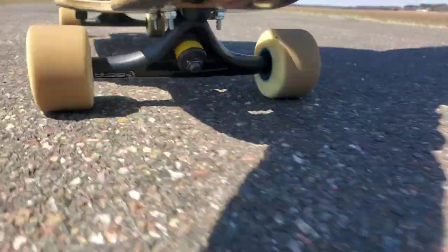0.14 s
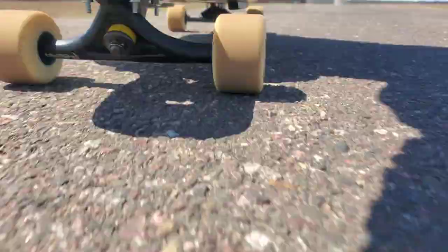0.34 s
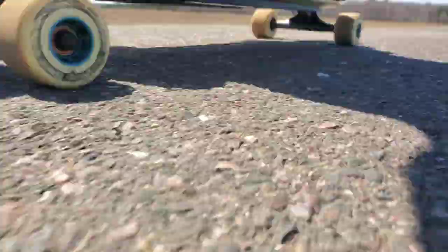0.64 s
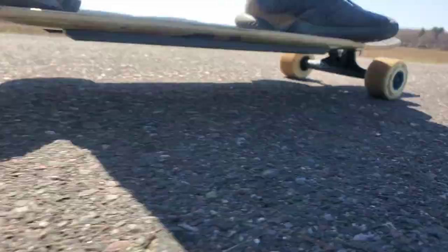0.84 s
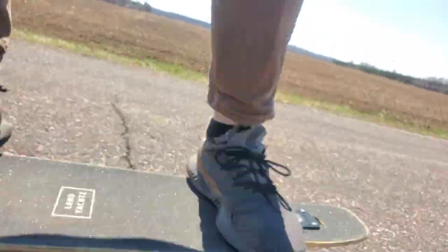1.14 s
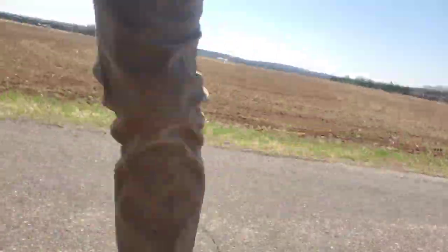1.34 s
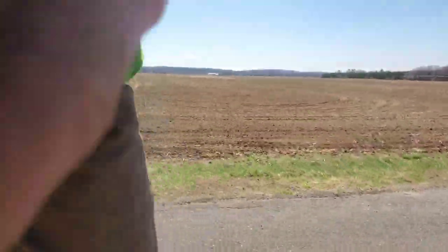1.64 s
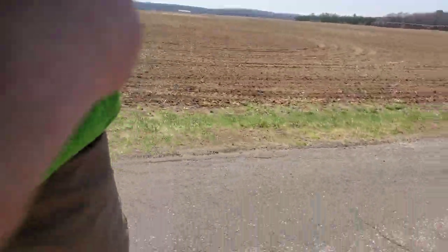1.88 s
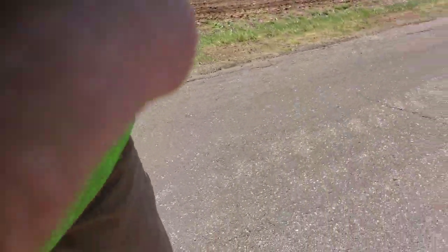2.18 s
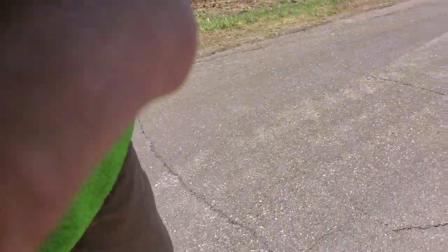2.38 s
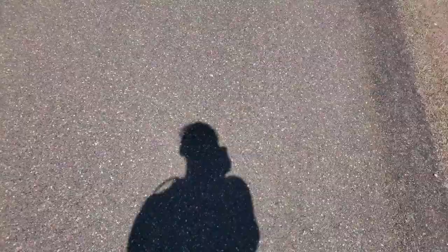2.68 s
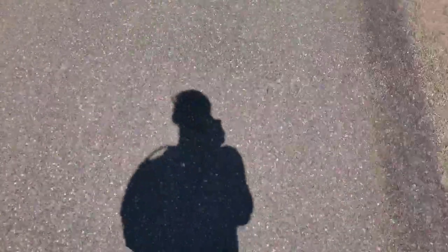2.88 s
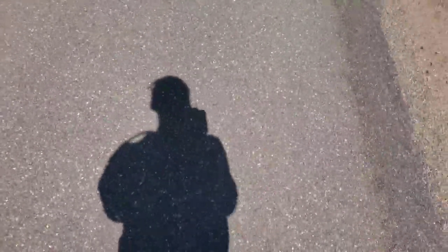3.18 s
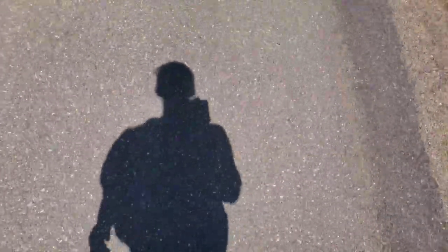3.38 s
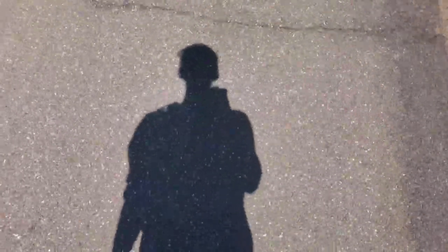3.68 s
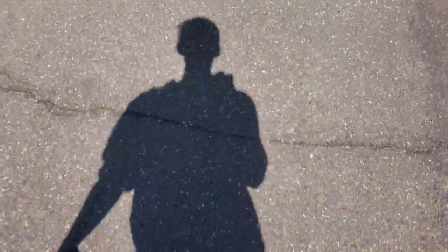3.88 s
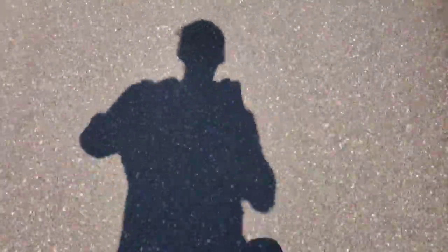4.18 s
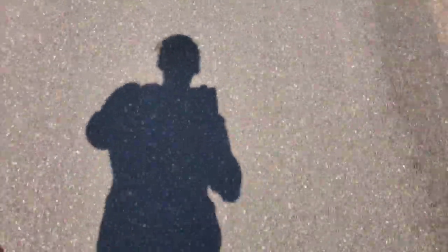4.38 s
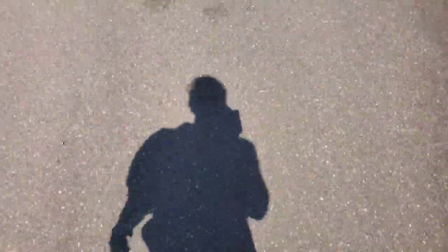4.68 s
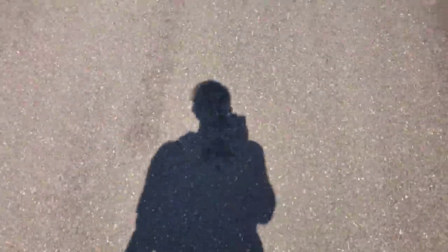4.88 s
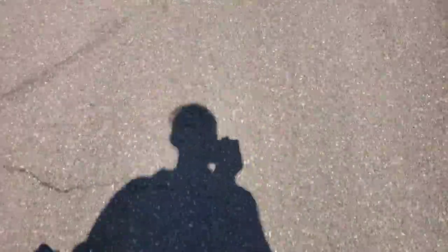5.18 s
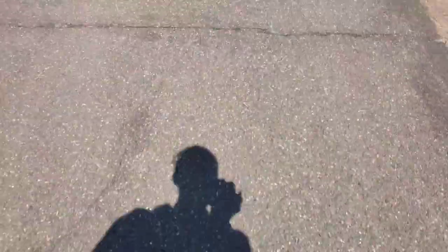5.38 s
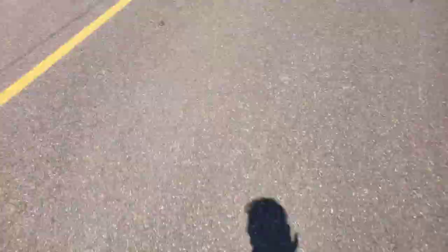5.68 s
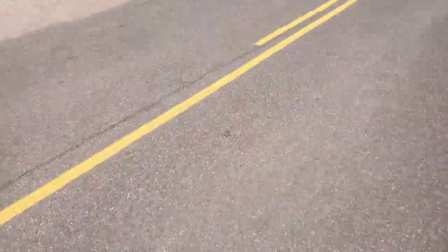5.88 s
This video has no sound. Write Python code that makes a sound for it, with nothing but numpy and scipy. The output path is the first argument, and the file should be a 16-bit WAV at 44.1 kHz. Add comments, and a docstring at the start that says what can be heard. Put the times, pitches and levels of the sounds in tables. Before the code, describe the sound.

Skateboard wheels rumble and hiss on a rough road up close, then after a cut roll louder and faster, chattering through turns.

```python
"""A low, ringing roar: a longboard rolls over coarse asphalt, heard from down by the wheels and then,
after a short silence, faster and from chest height. Stones in the road drum on the wheels and ring
the deck (the wooden board), higher when the wheels are pressed hard. In the carves (leaning turns)
the wheels scrub and chatter. Grit hisses and ticks under them, big stones knock, the bending deck
hums briefly, and a headwind buffets the left and right openings of the microphone."""
import sys
import numpy as np
from scipy import signal
from scipy.fft import rfft, irfft, next_fast_len
from scipy.io import wavfile
from scipy.ndimage import uniform_filter1d, map_coordinates

SR = 44100
rng = np.random.default_rng(int(sys.argv[2]) if len(sys.argv) > 2 else 0)


def generate_wav(signal):
    """Clip the signal to [-1, 1] and save it as 16-bit WAV at the path in sys.argv[1]."""
    frames = np.transpose(np.atleast_2d(signal))
    scaled = np.clip(frames, -1, 1) * 32767
    pcm = np.round(scaled).astype(np.int16)
    wavfile.write(sys.argv[1], SR, pcm)


N = 265910
TIME = np.arange(N) / SR
NEAR_END_S, FAR_START_S = 2.7222, 2.7927  # "near" is by the wheels, "far" is at chest height


def near_then_far(near, far):
    """One value for the first scene, another for the second."""
    return np.where(TIME < FAR_START_S, near, far)


def gain_of(db):
    """Turns decibels into a number to multiply by."""
    return 10 ** (np.asarray(db) / 20)


def evened(x):
    """Scales a sound to an average strength (rms) of 1."""
    return x / np.sqrt(np.mean(x ** 2) + 1e-20)


def peaked(x):
    """Scales a sound to a peak of 1."""
    return x / abs(x).max()


def steadied(x, span_s=1.0):
    """Holds the middle of a stereo sound near strength 1, keeping its fast flutter."""
    window = np.hanning(int(span_s * SR))
    power = signal.fftconvolve(x.mean(0) ** 2, window, "same")
    power /= signal.fftconvolve(np.ones(N), window, "same")
    return x / np.sqrt(abs(power) + 1e-20)


def follow(table):
    """Joins a table's points in time with straight lines, one curve a column."""
    times, *columns = np.transpose(table)
    return [np.interp(TIME, times, column) for column in columns]


def swells(table):
    """The strength of events that each build up and die away."""
    peak_s, db, build, release = np.transpose(table)
    since = TIME[:, None] - peak_s
    bells = np.exp(-(since / np.where(since < 0, build, release)) ** 2)
    return np.linalg.norm(gain_of(db) * bells, axis=1)


def level_at(tone, hz):
    """Looks up a tone table's level at any frequency."""
    table_hz, db = np.transpose(tone)
    return np.interp(np.log(hz + 1), np.log(table_hz + 1), db)


def colour(x, tone, size=8192):
    """Filters a sound by a tone table; clicks keep their sharp starts."""
    log_gain = np.log(gain_of(level_at(tone, abs(np.fft.fftfreq(size, 1 / SR)))))
    taps = np.fft.ifft(np.exp(np.conj(signal.hilbert(log_gain)))).real[:size // 2]
    return signal.oaconvolve(x, taps[None], axes=1)[:, :N]


def resonate(x, hz, width_hz):
    """Makes a sound ring at a pitch that may slide."""
    turn = np.exp(2j * np.pi * np.cumsum(hz) / SR)
    fade = np.exp(-np.pi * width_hz / SR)
    return 2 * (turn * signal.lfilter([(1 - fade) ** 2], [1, -2 * fade, fade * fade], x / turn)).real


def add(mix, start_s, sound):
    """Mixes a sound in at the given time."""
    part = mix[..., max(round(start_s * SR), 0):][..., :sound.shape[-1]]
    part += sound[..., :part.shape[-1]]


def flutter(rate_hz, channels=1):
    """A smooth random wobble of strength 1, up to about this rate."""
    size = next_fast_len(N)
    hz = np.fft.rfftfreq(size, 1 / SR)
    spectrum = rfft(rng.standard_normal((channels, size))) / (1 + (hz / rate_hz) ** 4)
    return evened(irfft(spectrum, size)[:, :N])


def spread(pair, width):
    """Makes stereo: the first signal goes to both sides alike, the second with opposite signs."""
    return pair[0] + np.array([[1], [-1]]) * width * pair[1]


def stones(per_s, spread_db):
    """Two random streams of tiny hits: many small, a few large."""
    size = gain_of(spread_db * np.minimum(rng.exponential(1, (2, N)), 5))
    return size * rng.choice([-1, 1], (2, N)) * (rng.random((2, N)) < per_s / SR)


# The road's push on the board, a near table and a far one: (time [s], level [dB])
ROAD_PUSH = [
    [(0, -32.5), (0.1, -29), (0.19, -28), (0.33, -35), (0.47, -34), (0.62, -31), (0.72, -30.5), (0.9, -32),
     (1.15, -38.5), (1.28, -32.5), (1.39, -30), (1.5, -26.5), (1.62, -30.5), (1.8, -34), (1.95, -34),
     (2.05, -26), (2.13, -40.5), (2.23, -32), (2.42, -36.5), (2.55, -32), (2.72, -31.5)],
    [(2.79, -27), (2.91, -25), (2.945, -27.5), (3.0, -27.5), (3.3, -28.5), (3.62, -28), (3.7, -31.5),
     (3.78, -28.5), (3.84, -34.5), (3.89, -22.5), (3.938, -35.5), (3.96, -24.5), (4.05, -23), (4.11, -25),
     (4.2, -21), (4.29, -21.5), (4.32, -22.5), (4.38, -19.5), (4.41, -22.5), (4.47, -17.5), (4.57, -27),
     (4.68, -21.5), (4.735, -28.5), (4.81, -26), (4.93, -32), (5.06, -25), (5.14, -28), (5.23, -24),
     (5.35, -22), (5.45, -24.5), (5.6, -26.5), (5.8, -25.5), (5.89, -25.5), (6.03, -23.5)],
]


def rolling():
    """How hard the road shakes the board at each moment."""
    return gain_of(near_then_far(*(follow(table)[0] for table in ROAD_PUSH)))


# The natural notes of the deck and its axles: (pitch [Hz], width [Hz], level [dB])
DECK_NOTES = [(421.3, 45, 1), (459.7, 41.3, -1), (518, 52, -9), (575.9, 35.6, -0.5), (610.8, 40, -1),
              (735, 50, 3), (796, 41, -4.5)]
# The notes slide as the rider's weight shifts: (time [s], change [share of pitch])
NOTE_SLIDE = [(0, 0.023), (0.8, 0.013), (1.4, 0.019), (1.9, 0.015), (2.35, 0.0014), (2.9, 0.0052),
              (3.5, 0.0085), (4.05, -0.015), (4.35, 0.018), (4.8, 0.0024), (5.25, -0.005), (5.8, -0.017)]
# The pitch the wheels excite most, higher when pressed hard: (time [s], pitch [Hz])
CONTACT_PITCH = [(0, 485), (0.8, 522), (1.35, 490), (1.62, 555), (1.95, 590), (2.3, 460), (2.72, 540),
                 (2.92, 484), (3.2, 532), (3.45, 610), (3.8, 604), (4.13, 660), (4.28, 533), (4.46, 642),
                 (4.62, 553), (4.9, 590), (5.2, 700), (5.45, 580), (5.75, 597), (5.95, 500)]
# Slow wheels strike softly and leave the high notes quiet: (frequency [Hz], level [dB])
SLOW_WHEEL_TONE = [(620, 0.5), (710, -15.5), (1000, -9.5)]


def deck_roar(road):
    """Stones ring the deck's drifting notes; close to the wheels the sound is wider."""
    blows = spread(road, width=near_then_far(0.26, 0.12))
    drifts = 1 + follow(NOTE_SLIDE)[0] + 0.016 * flutter(rate_hz=6.7, channels=len(DECK_NOTES))
    notes = [steadied(resonate(blows, hz * drift, width))
             for (hz, width, _), drift in zip(DECK_NOTES, drifts)]
    flicker = gain_of(2.0 * flutter(rate_hz=6.9, channels=len(DECK_NOTES)))
    drives = note_shares(follow(CONTACT_PITCH)[0]) * flicker
    ring = steadied(sum(drive * note for note, drive in zip(notes, drives)), span_s=0.064)
    ring = near_then_far(colour(ring, SLOW_WHEEL_TONE), ring)
    return rolling() * hops(depth_db=1.5, lead_s=0.0037) * ring


def note_shares(contact_hz, octaves_below=0.59, octaves_above=0.39):
    """A hit favours the deck notes near its own pitch; neighbours swing opposite ways."""
    hz, _, db = np.transpose(DECK_NOTES)[:, :, None]
    octaves = np.log2(hz / contact_hz)
    reach = np.where(octaves < 0, octaves_below, octaves_above)
    drive = gain_of(db) * np.exp(-(octaves / reach) ** 2)
    signs = (-1) ** np.arange(len(DECK_NOTES))[:, None]
    return drive * signs / np.linalg.norm(drive, axis=0)


# The tone of the shaking board, near and far: (frequency [Hz], level [dB])
NEAR_RUMBLE_TONE = [(40, -56.5), (110, -2), (190, 7.5), (262, 5.5), (325, 1), (390, 11), (520, -25.5),
                    (660, -7.5), (740, -19), (1000, -52), (2500, -110)]
FAR_RUMBLE_TONE = [(40, -5), (110, -15.5), (190, 9), (220, 3), (262, 11.5), (325, 3), (520, -7), (700, -13),
                   (900, -55), (2500, -115)]


def board_rumble(road):
    """The whole board shakes with a low rumble; at speed it partly follows the road's push."""
    near = gain_of(-41.0) * steadied(colour(spread(road, 0.3), NEAR_RUMBLE_TONE))
    far = rolling() ** 0.5 * gain_of(-24.0) * steadied(colour(spread(road, 0.2), FAR_RUMBLE_TONE))
    flicker = gain_of(1.5 * flutter(rate_hz=26.0))
    return jolts(height_db=3.0, settle_s=0.02) * flicker * near_then_far(near, far)


# The rider leans into a turn: (peak time [s], scrub level [dB], build [s], release [s])
CARVE_SWELLS = [(0.27, -44.5, 0.34, 0.97), (4.06, -27.5, 0.12, 0.17), (5.25, -35.5, 0.19, 0.12),
                (5.78, -44.5, 0.27, 0.073)]
# The tone of scrubbing wheels, near and far, and of fast straight rolling: (frequency [Hz], level [dB])
NEAR_SCRUB_TONE = [(450, -28.5), (670, 2), (738, 10.5), (830, -0.5), (970, -0.5), (1100, 3), (1240, 2.5),
                   (1480, -2.5), (1900, -6.5), (2300, -7.5), (3000, -43), (6000, -16.5)]
FAR_SCRUB_TONE = [(450, -14), (700, -2), (840, 27), (1000, 6.5), (1200, 10.5), (1340, 6.5), (1440, -1),
                  (1560, 5), (1760, 1), (2020, -12), (2300, -9), (2700, -18.5), (6000, -34.5)]
RASP_TONE = [(450, -5.5), (700, 15), (800, 19), (900, 4), (1000, 7.5), (1120, 6.5), (1270, 8), (1430, -0.5),
             (1600, -1), (1800, -0.5), (2050, -2.5), (2300, -5), (2800, -12), (3300, -9), (3750, -14),
             (4400, -13.5), (6000, -19)]
# The tone of the difference between left and right, when far: (frequency [Hz], level [dB])
SCRUB_WIDTH = [(800, -7.5), (1300, -11.5), (1550, -6), (1750, -13), (2050, -1.5), (2800, 4.5)]


def wheel_scrub(road):
    """Wheels slip from stone to stone in hard jerks: a rasp going straight, a chatter in a turn."""
    slips = evened(road) + evened(stones(per_s=1600, spread_db=1.5))
    slips *= gain_of(2.0 * flutter(rate_hz=40))
    carving = swells(CARVE_SWELLS)
    crunch = slips + 0.85 * evened(stones(per_s=260, spread_db=1.0))  # up close, single stones stand out
    near = np.hypot(gain_of(-60.5), carving) * steadied(colour(spread(crunch, 0.77), NEAR_SCRUB_TONE))
    wide = spread([slips[0], colour(slips[1:], SCRUB_WIDTH)[0]], 0.73)
    rasp = rolling() * gain_of(-17.0) * steadied(colour(wide, RASP_TONE))
    chatter = carving * steadied(colour(wide, FAR_SCRUB_TONE))
    return near_then_far(near, rasp + chatter)


# Near grit, fading as the microphone rises from the wheels: (time [s], hiss [dB], sizzle [dB])
NEAR_GRIT_LEVELS = [(0, -51, -51), (0.2, -48.5, -49), (0.4, -51.5, -53), (0.65, -46.5, -49.5),
                    (1.05, -48, -45), (1.48, -54.5, -55), (1.82, -67, -59), (1.94, -53, -63),
                    (2.03, -61.5, -61.5), (2.3, -68.5, -65), (2.56, -58.5, -62.5), (2.72, -62, -66)]
# Grit thrown up after each fast turn: (peak time [s], level [dB], build [s], release [s])
GRIT_SPRAY = [(4.2, -47, 0.25, 0.16), (5.38, -49.5, 0.18, 0.23), (5.85, -54.5, 0.2, 0.25)]
# How fast the wheels spin: (time [s], speed [turns per second])
WHEEL_SPEED = [(0, 12.2), (2.72, 7.2), (2.79, 31), (6.03, 38.5)]
# The tone of the hiss (a near table and a far one) and the brighter sizzle: (frequency [Hz], level [dB])
HISS_TONES = [
    [(700, -23), (1500, -4), (2300, 8.5), (3050, 2.5), (3750, 6.5), (4900, 3), (6200, 3.5), (7300, 8),
     (8400, 3), (9600, 6), (11000, 4.5), (14500, -14)],
    [(700, 12), (1500, 13), (2300, 7.5), (3100, 0.5), (3750, 13), (4200, 4), (4700, 3.5), (6200, 5),
     (6900, 9), (7500, 11.5), (8200, 5.5), (9600, 5.5), (11000, 5.5), (14500, -2.5)],
]
SIZZLE_TONE = [(6000, -36), (10500, -22), (11350, -8), (11750, 0.5), (12150, 0.5), (12700, -7.5),
               (13500, -4), (14500, -14)]
# The treble leans to one side, a near table and a far one: (frequency [Hz], left minus right [dB])
GRIT_BALANCE = [
    [(3000, 0), (7000, -0.5), (8200, -3), (9500, 2.5), (11800, 12.5), (13500, 0)],
    [(4500, -1), (5500, 8), (7000, 1.5), (8300, 14), (11500, -12), (14000, 22)],
]


def grit_hiss():
    """Fine grains crushed under the wheels hiss and sizzle, pulsing slightly with each spin."""
    hiss_db, sizzle_db = follow(NEAR_GRIT_LEVELS)
    spray = swells(GRIT_SPRAY)
    hiss_level = near_then_far(gain_of(hiss_db), np.hypot(gain_of(-55), spray))
    sizzle_level = near_then_far(gain_of(sizzle_db), np.hypot(gain_of(-58), gain_of(-7) * spray))
    spin_hz = follow(WHEEL_SPEED)[0] * (1 + 0.032 * flutter(rate_hz=7.5)[0])
    spin = np.cos(2 * np.pi * np.cumsum(spin_hz) / SR)
    crunch_db = 1.9 * flutter(rate_hz=23)
    dust = stones(per_s=16000, spread_db=1.8) * gain_of(crunch_db + 0.46 * spin)
    grains = colour(stones(per_s=7200, spread_db=5.0), SIZZLE_TONE) * gain_of(crunch_db + 0.74 * spin)
    sizzle = sizzle_level * steadied(grains)
    both_scenes = [hiss_level * steadied(colour(dust, tone)) + sizzle for tone in HISS_TONES]
    return near_then_far(*map(lean, both_scenes, GRIT_BALANCE))


def lean(x, balance):
    """Tips each frequency left or right, keeping its power."""
    size = next_fast_len(N)
    sides = gain_of(np.array([[.5], [-.5]]) * level_at(balance, np.fft.rfftfreq(size, 1 / SR)))
    return irfft(rfft(x, size) * sides / np.sqrt(np.mean(sides ** 2, 0)), size)[:, :N]


# The echo between road and deck shifts as the microphone moves: (time [s], delay [ms], strength [0-1])
ROAD_ECHO = [(0, 2.6, 0.4), (0.7, 2.68, 0), (1.1, 1.17, 0.3), (1.32, 0.79, 0), (1.55, 0.666, 0.54),
             (1.8, 0.72, 0.2)]


def with_road_echo(x, dull_above_hz=3200):
    """A very short, shifting echo adds a sweeping tone; the rough road reflects little treble."""
    delay_ms, strength = follow(ROAD_ECHO)
    earlier = np.arange(N) - delay_ms * SR / 1000
    echo = np.array([map_coordinates(side, [earlier], order=3) for side in x])
    dulled = signal.sosfiltfilt(signal.butter(2, dull_above_hz, fs=SR, output="sos"), echo)
    return x + strength * dulled


# Gusts on the microphone: (peak time [s], level [dB], build [s], release [s])
WIND_GUSTS = [(0.02, -27.5, 0.099, 0.049), (0.24, -30, 0.09, 0.21), (1.55, -34, 0.059, 0.35),
              (2.02, -28, 0.14, 0.22), (2.18, -28, 0.039, 0.14), (2.54, -28.5, 0.096, 0.24),
              (5.6, -30, 0.36, 0.075)]
# The deep tone of the wind: (frequency [Hz], level [dB])
WIND_TONE = [(25, -5), (50, -1.5), (85, -0.5), (130, 0), (200, -0.5), (300, -2), (440, -4), (600, -7.5),
             (720, -15.5), (850, -21), (1300, -31.5), (2500, -55.5), (8000, -84)]


def headwind():
    """Swirls of air hit each microphone opening separately: a steady breeze with gusts on top."""
    swirls = rng.standard_normal((2, N)) * gain_of(3.54 * flutter(rate_hz=42, channels=2))
    breeze = gain_of(near_then_far(-38, -40))
    return np.hypot(breeze, swells(WIND_GUSTS)) * steadied(colour(swirls, WIND_TONE), span_s=0.69)


# Big stones hitting the board:
# (time [s], peak [dB], contact pitch [Hz], clack against ring [dB], thump against ring [dB])
BIG_STONES = [(0.047, -25, 440, -22, -20), (0.135, -21.5, 450, -16, -16), (0.193, -16, 450, -14, -1),
              (0.198, -15.5, 477, -3, 6), (0.207, -16, 630, -2, 6), (0.221, -15.5, 450, -12, 21),
              (0.278, -13, 455, -12, 9), (0.354, -25, 506, 7, 3), (0.696, -19, 454, -32, -6),
              (0.844, -17.5, 493, -21, 0), (1.415, -18, 414, -36, -29), (1.44, -16.5, 430, -34, -27),
              (1.487, -26, 570, -32, -21), (1.997, -14.5, 543, -26, 7), (2.0255, -9.5, 600, -13, 5),
              (2.174, -19, 402, -21, 1), (2.209, -18, 444, -13, -4), (2.252, -20, 430, -12, 9),
              (2.378, -22.5, 450, -16, 2), (2.468, -22, 400, -14, -4), (2.53, -21, 430, -25, 7),
              (2.552, -17.5, 450, -10, 12), (2.612, -24, 595, -4.5, 2), (2.665, -23.5, 600, -5, 0),
              (2.822, -24, 525, -22, -16), (2.85, -23, 450, -29, -18), (2.894, -20.5, 470, -33, -21),
              (2.962, -21, 508, -22, -11), (3.025, -19.5, 545, -10, -8), (3.082, -17, 445, -26, -16),
              (3.108, -18.5, 573, -18, -10), (3.297, -25, 557, 1.5, -3), (3.371, -21, 560, -6, 2),
              (3.412, -16, 586, -26, -4), (3.551, -13, 600, -13, -6), (3.733, -15.5, 626, -21, -27),
              (3.872, -24, 734, -9, -11), (3.9, -29, 710, -6, -3), (3.95, -17, 716, -4, -3),
              (3.98, -33, 740, 7, -13), (3.997, -15, 740, -8, -14), (4.027, -18, 751, 4, -10),
              (4.044, -11, 690, -15, -6), (4.066, -13.5, 754, 13, -18), (4.115, -24, 740, 13, -12),
              (4.129, -16, 740, 0, -22), (4.158, -13, 746, -14, -14), (4.184, -20.5, 730, 0, -14),
              (4.206, -17, 650, -9, -9), (4.25, -14, 450, -24, -17), (4.281, -10, 450, -29, -5),
              (4.381, -13, 590, -24, -9), (4.424, -14, 707, -9, 0), (4.452, -8.5, 660, -8, -6),
              (4.477, -19, 674, -6, -22), (4.519, -21, 635, -7, -12), (4.607, -21, 600, -3, -2),
              (4.633, -15.5, 590, -20, -8), (4.692, -12, 670, -26, -11), (4.768, -17, 746, -12, -12),
              (4.786, -16, 613, -26, -29), (4.854, -15, 566, -28, -18), (4.987, -25, 636, -7, -3),
              (5.038, -14, 636, -15, -15), (5.052, -23, 600, -20, -21), (5.116, -23.5, 700, 4, -7),
              (5.168, -16, 590, -13, 4), (5.187, -16, 590, -12, 4), (5.19, -27, 710, 5, -5),
              (5.213, -20, 700, 2, -12), (5.227, -12.5, 690, -8, 2), (5.249, -15, 700, 2, -2),
              (5.278, -16.5, 700, 16, -12), (5.336, -19, 616, -18, 6), (5.473, -17, 550, -27, -8),
              (5.696, -12, 615, -10, -11), (5.741, -16.5, 670, -13, -7), (5.955, -11, 460, -27, -10)]
# The tone of a stone's direct push and of its clack on the wheel: (frequency [Hz], level [dB])
THUMP_TONE = [(60, -28.5), (200, -1.5), (450, -0.5), (620, -4), (800, -16.5), (1300, -28.5), (2500, -74)]
CLACK_TONE = [(300, -23), (600, 1), (820, 9.5), (1000, 9.5), (1220, 7), (1430, -5.5), (1600, 5),
              (2000, -21.5), (2400, -14), (3000, -41), (6000, -48)]


def stone_knocks(size=4096, damping=1.43):
    """A big stone gives one short push: the deck rings, with a dull thump and, if hard, a clack."""
    out, t = np.zeros(N), np.arange(size) / SR
    hz, width, _ = np.transpose(DECK_NOTES)[:, :, None]
    notes = t ** 0.84 * np.exp(-np.pi * damping * width * t) * np.sin(2 * np.pi * hz * t)
    push = signal.unit_impulse(size)[None]
    thump, clack = (peaked(colour(push, tone)[0, :size]) for tone in (THUMP_TONE, CLACK_TONE))
    for start_s, db, contact_hz, clack_db, thump_db in BIG_STONES:
        ring = (note_shares(contact_hz) ** 2 * notes).sum(0)
        blow = peaked(ring) + gain_of(thump_db) * thump + gain_of(clack_db) * clack
        add(out, start_s, gain_of(db) * peaked(blow))
    return out


def hops(depth_db, lead_s):
    """Just before a knock the wheel skips over a hollow, and the roar sags for an instant."""
    starts = np.sort([row[0] for row in BIG_STONES] + [TIME[-1] + 1])
    until = (starts[np.searchsorted(starts, TIME)] - TIME) / lead_s
    return gain_of(-depth_db * until * np.exp(1 - until))


def jolts(height_db, settle_s):
    """After a knock the board keeps bouncing, and the rumble grows for a moment."""
    starts = np.sort([-np.inf] + [row[0] for row in BIG_STONES])
    since = TIME - starts[np.searchsorted(starts, TIME) - 1]
    return gain_of(uniform_filter1d(height_db * np.exp(-since / settle_s), size=90))


# Loose grains breaking under a wheel:
# (time [s], level [dB], pitch [Hz], crack against snap [dB], ping against snap [dB])
LOOSE_GRAINS = [(0.199, -16.5, 9940, 1, -2), (0.1989, -28, 6600, -16, -4), (0.2014, -31, 10500, -3, -14),
                (0.2302, -29, 10000, -12, -12), (0.2410, -24, 11500, -12, -12),
                (1.192, -30, 12300, -12, -10), (1.268, -32, 12000, -12, -10), (1.698, -39, 12100, -12, -14),
                (1.857, -39, 6300, -6, -22), (4.006, -20, 1770, -21, -8), (4.004, -27, 2450, -14, -9),
                (5.19, -14.5, 2280, -32, -4), (5.19, -25, 1760, -28, -10)]


def grain_ticks(size=600, ping_cycles=2.2, crack_s=0.00019):
    """A grain cracks, snaps away and pings briefly; big, low ones take longer."""
    out, t = np.zeros((2, N)), np.arange(size) / SR
    for start_s, db, hz, crack_db, ping_db in LOOSE_GRAINS:
        shape = t * np.exp(-t / (0.0002 + 0.8 / hz))
        burst = spread(rng.standard_normal((2, size)), 0.89) * shape
        band = signal.butter(6, [0.605 * hz, 1.08 * hz], "bandpass", fs=SR, output="sos")
        snap = signal.sosfilt(band, burst)
        ping = t * np.exp(-t * hz / ping_cycles) * np.sin(2 * np.pi * hz * t)
        crack = spread(rng.standard_normal((2, size)), 0.89) * np.exp(-t / crack_s)
        body = peaked(evened(snap) + gain_of(ping_db) * evened(ping))
        add(out, start_s, gain_of(db) * (body + gain_of(crack_db) * peaked(crack)))
    return out


# The deck's hum, heard right beside it: (peak time [s], level [dB], build [s], release [s])
HUM_SWELLS = [(0.72, -45.5, 0.18, 0.16), (0.95, -35, 0.053, 0.045)]


def deck_hum(hz=93, width_hz=18):
    """The deck bends under the rider and hums at its lowest note."""
    shaking = spread(rng.standard_normal((2, N)), 0.3)
    hum = resonate(shaking, np.full(N, hz), width_hz)
    return swells(HUM_SWELLS) * steadied(hum, span_s=0.18)


def scene():
    """One stony road drives the roar, rumble and scrub; the other sounds go on top."""
    road = stones(per_s=1800, spread_db=3.0)
    board = deck_roar(road) + board_rumble(road) + deck_hum()
    wheels = with_road_echo(wheel_scrub(road) + grit_hiss())
    return board + wheels + stone_knocks() + grain_ticks() + headwind()


def record(dry):
    """Trims the deepest bass and highest treble, and leaves a short silence between the scenes."""
    low_cut_hz, high_cut_hz = 34, 14700
    thinned = signal.sosfilt(signal.butter(4, low_cut_hz, "highpass", fs=SR, output="sos"), dry)
    gate = np.where((TIME < NEAR_END_S) | (TIME > FAR_START_S), 1, gain_of(-56.5))
    treble_cut = signal.firwin(511, high_cut_hz, window=("kaiser", 9), fs=SR)
    return signal.oaconvolve(thinned * gate, treble_cut[None], "same")


dry = scene()
out = record(dry)
generate_wav(out)
```